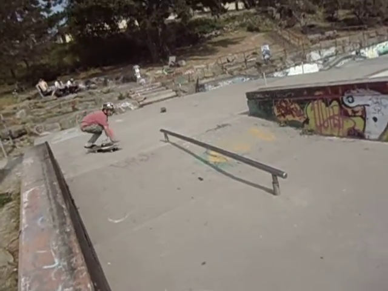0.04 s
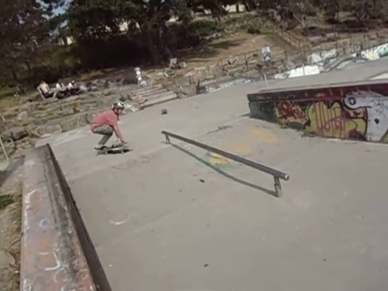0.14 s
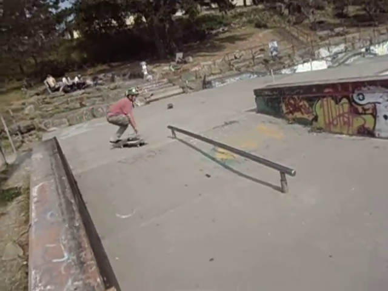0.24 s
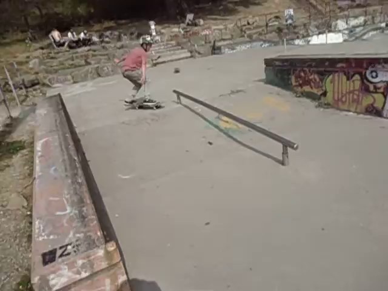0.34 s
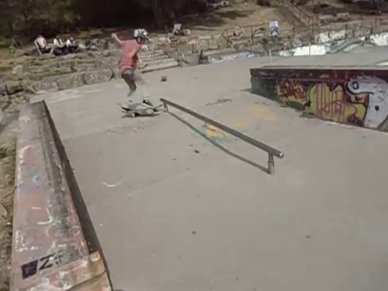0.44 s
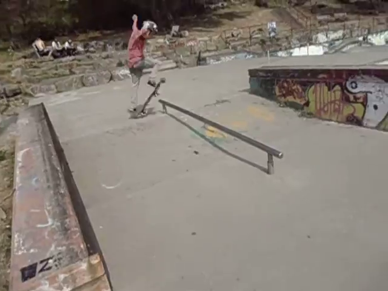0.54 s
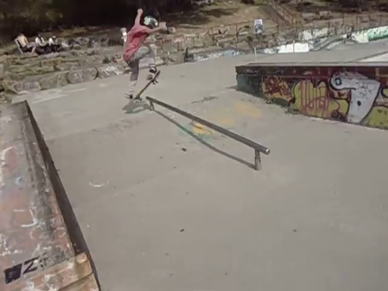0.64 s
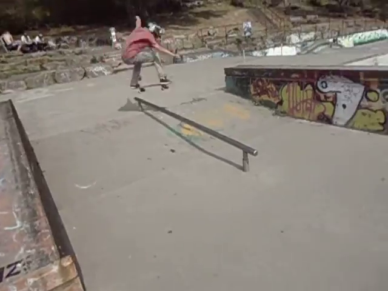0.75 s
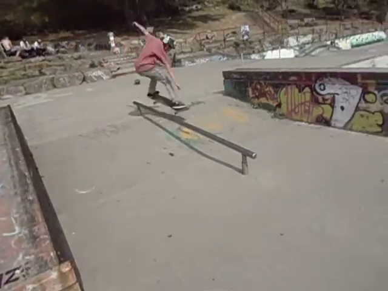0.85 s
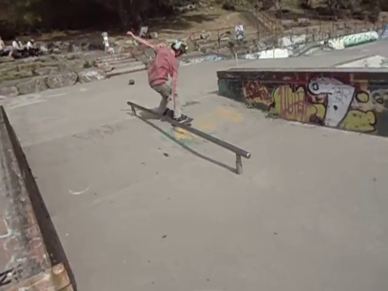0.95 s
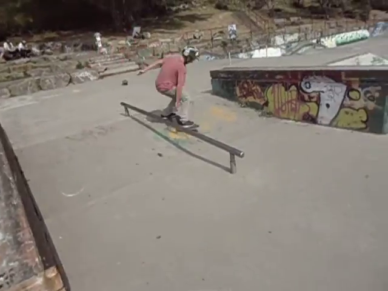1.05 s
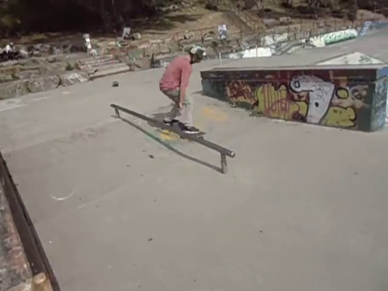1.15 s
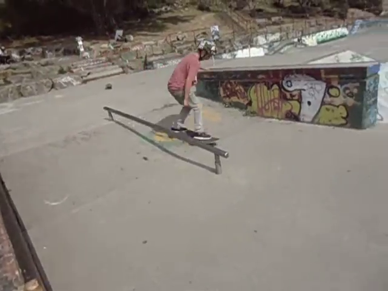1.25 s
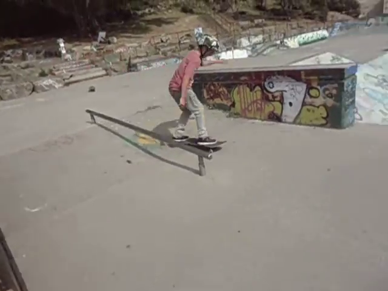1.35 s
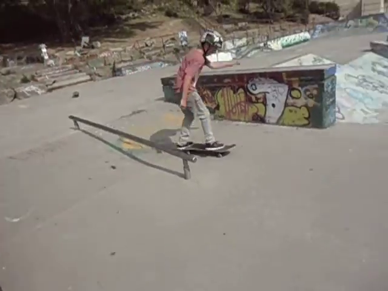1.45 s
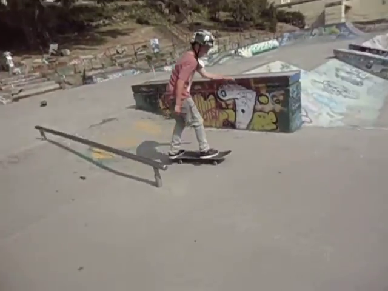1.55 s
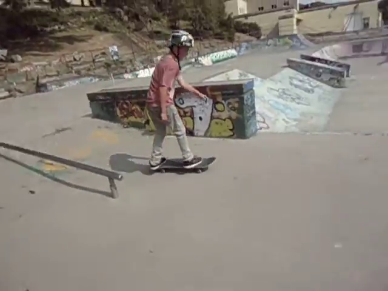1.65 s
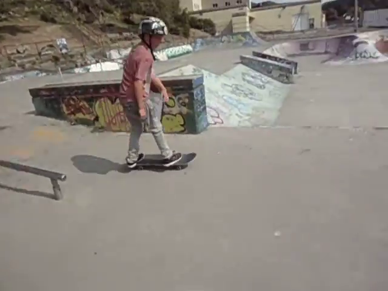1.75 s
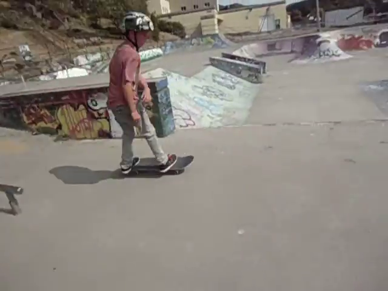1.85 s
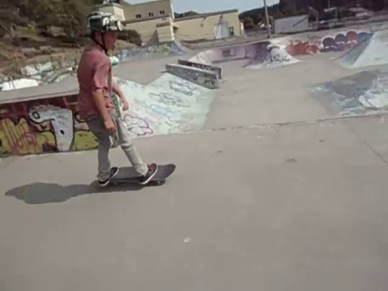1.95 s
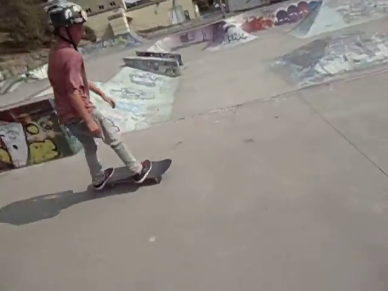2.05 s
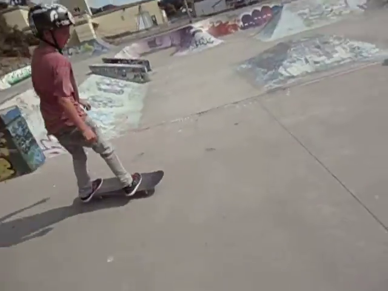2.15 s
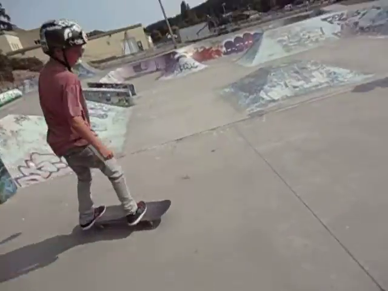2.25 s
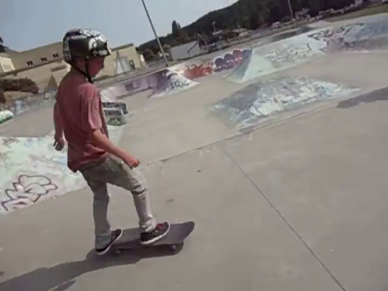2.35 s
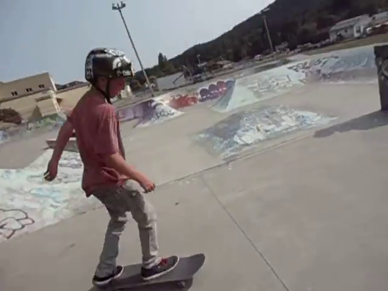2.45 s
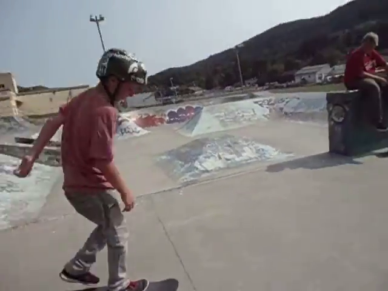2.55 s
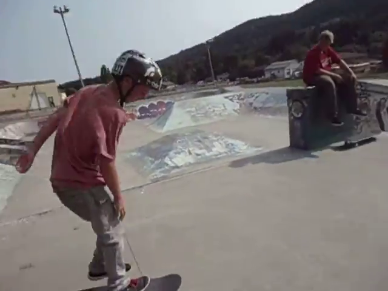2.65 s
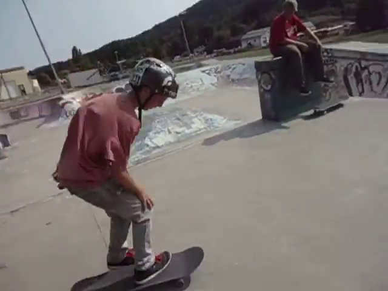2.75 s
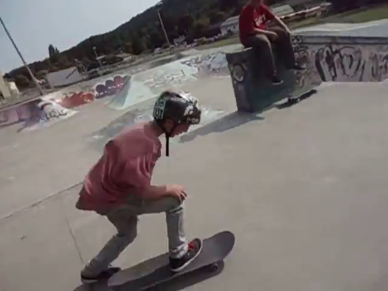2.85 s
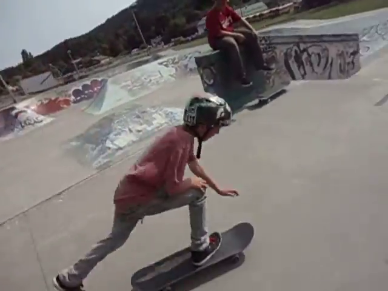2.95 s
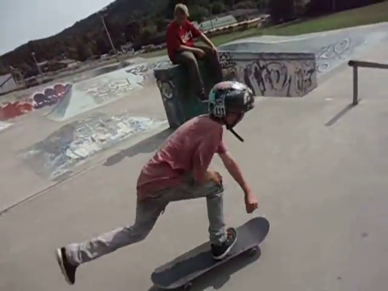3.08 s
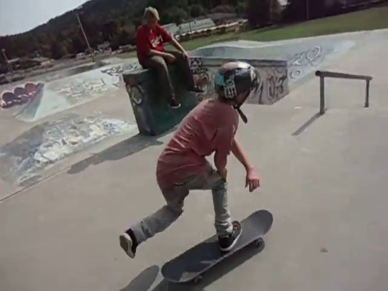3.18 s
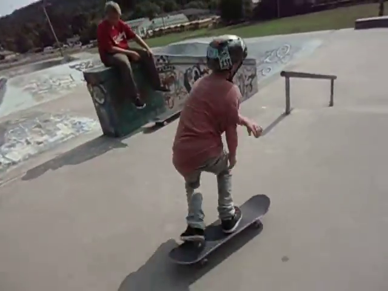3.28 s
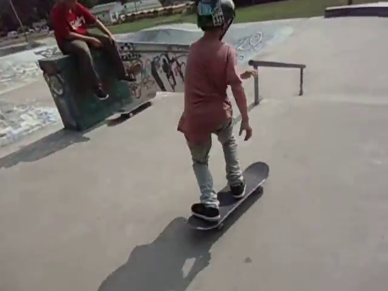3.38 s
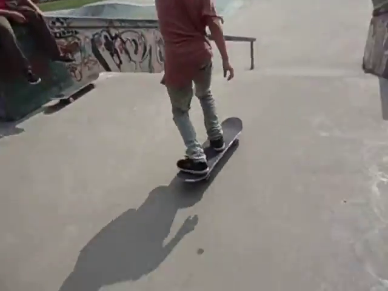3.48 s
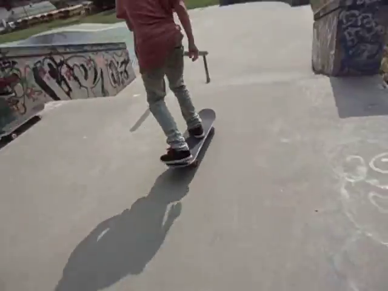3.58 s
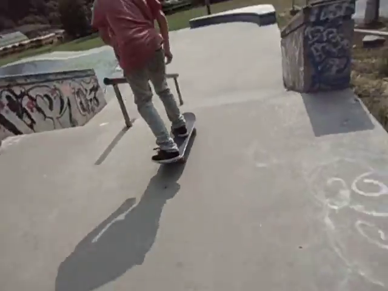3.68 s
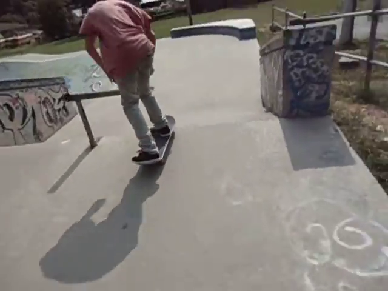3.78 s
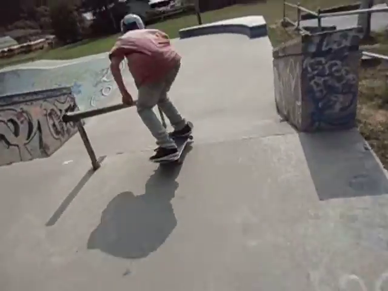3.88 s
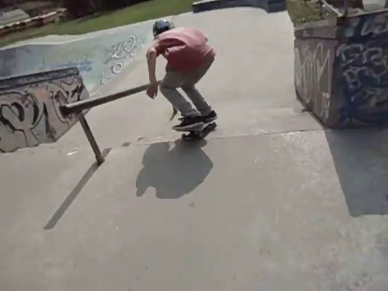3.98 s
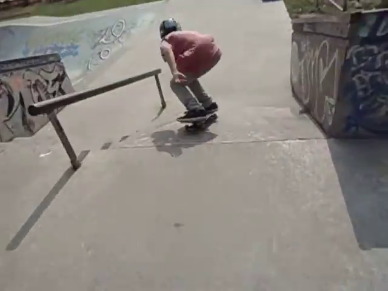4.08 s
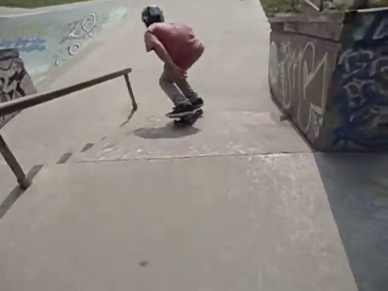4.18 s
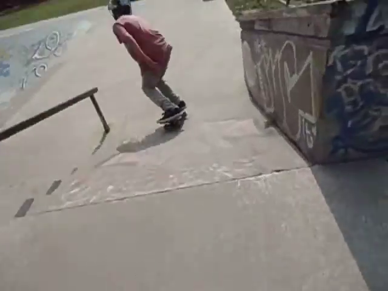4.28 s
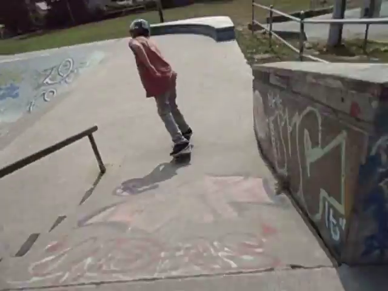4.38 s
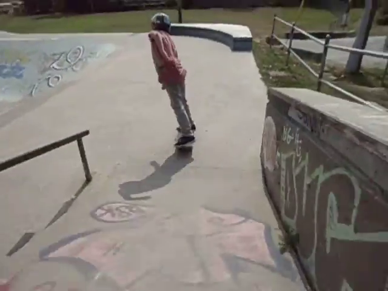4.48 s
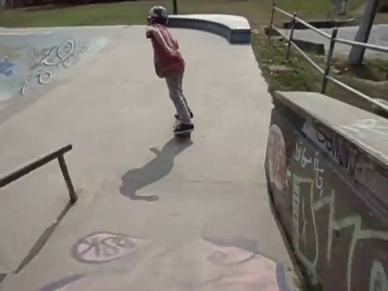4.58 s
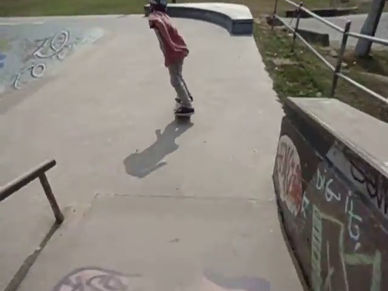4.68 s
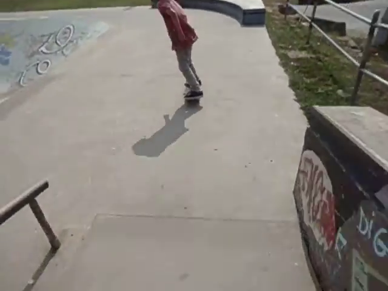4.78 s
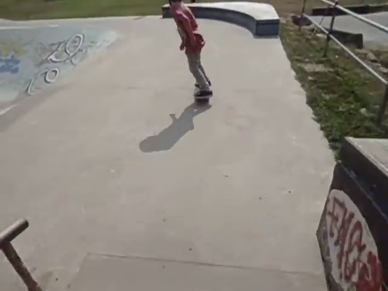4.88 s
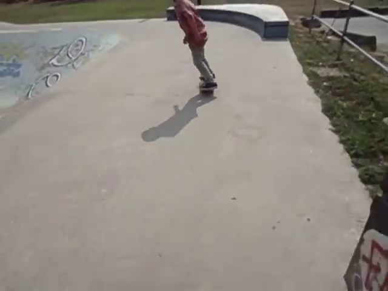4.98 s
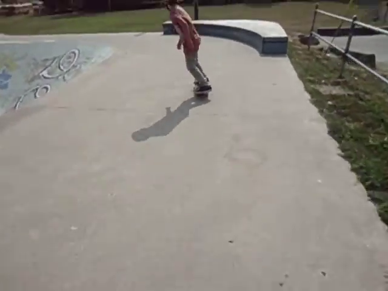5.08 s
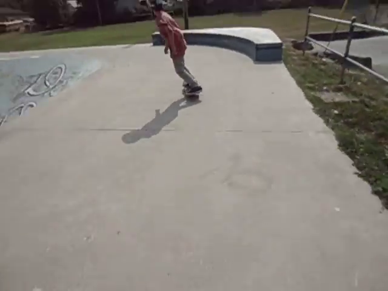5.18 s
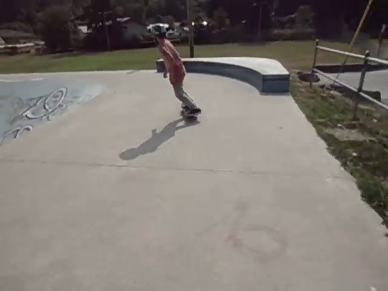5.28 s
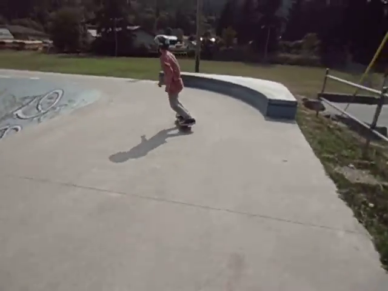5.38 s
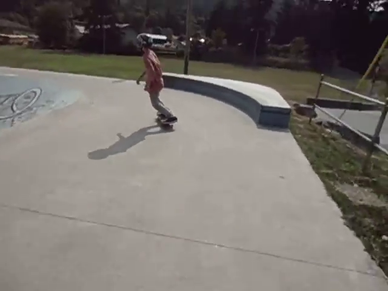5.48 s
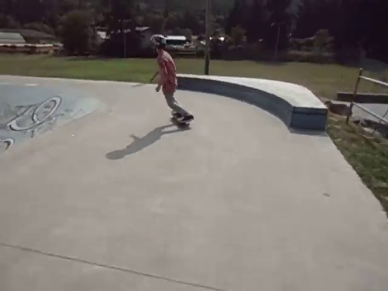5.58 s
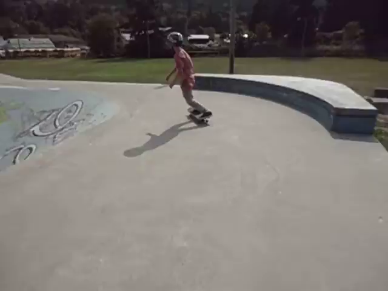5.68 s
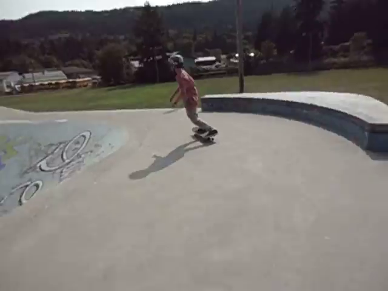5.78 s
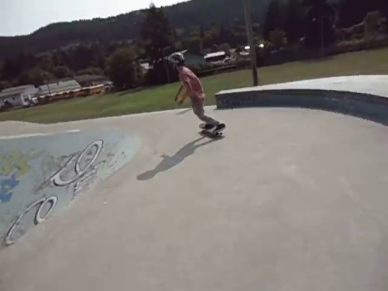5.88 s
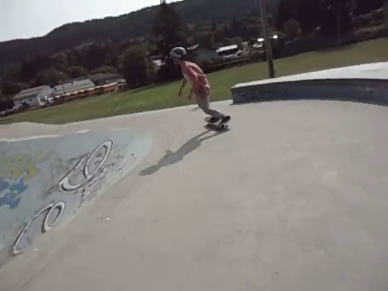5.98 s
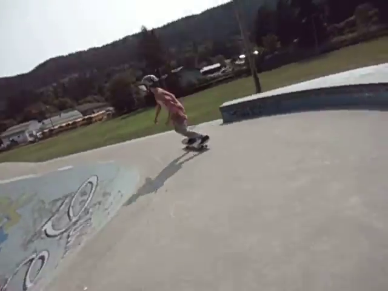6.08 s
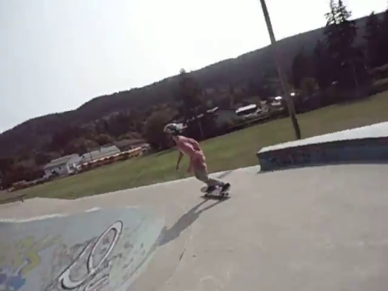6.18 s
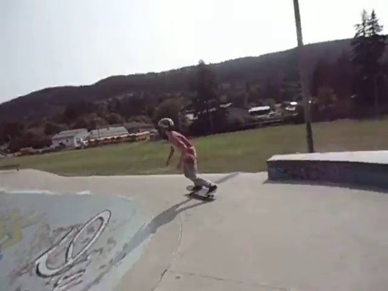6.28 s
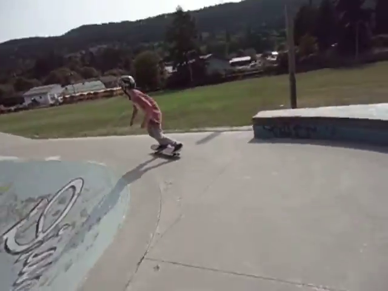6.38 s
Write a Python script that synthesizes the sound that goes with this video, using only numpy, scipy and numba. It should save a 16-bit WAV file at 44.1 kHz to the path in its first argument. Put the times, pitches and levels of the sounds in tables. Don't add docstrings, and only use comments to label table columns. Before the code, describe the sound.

At an outdoor concrete skatepark, hard wheels hum faintly over grit, the tail pops, there is a brief airborne gap, and trucks slam onto a rail. Light scraping and ticking follow, then pushes, shoe scuffs and knocks. The board hops a small drop with a clack and rolls off with a growing hollow rumble. A small, narrow camera microphone thumps in the wind and overloads on peaks.

```python
import sys
import numpy as np
from scipy import signal
from scipy.fft import rfft, irfft
from scipy.io import wavfile
from scipy.ndimage import uniform_filter1d
from numba import njit

SR = 44100
rng = np.random.default_rng(int(sys.argv[2]) if len(sys.argv) > 2 else 0)


def wrap_up_sound(samples):
    columns = np.atleast_2d(samples).T
    tamed = np.clip(columns, -1, 1)
    steps = np.round(tamed * 32767).astype(np.int16)
    wavfile.write(sys.argv[1], SR, steps)


def volts(x):
    e = np.asarray(x, float) / 20
    return 10 ** e


N = 283563


def level(x):
    return x / np.sqrt(np.mean(x ** 2))


def curves(table):
    s, *columns = np.transpose(table)
    return [np.interp(np.arange(N) / SR, s, c) for c in columns]


def stretches(table):
    row = np.searchsorted(np.array(table)[:, 0], np.arange(N) / SR, "right") - 1
    held = np.array(table)[np.maximum(row, 0), 1:].T
    return uniform_filter1d(held, int(0.046 * SR))


def bump(s, length_s):
    return np.exp(-((np.arange(N) / SR - s) / length_s) ** 2)


def walk(rate_hz):
    k = int(SR / rate_hz)
    held = np.repeat(rng.standard_normal(N // k + 1), k)
    return 1.27 * uniform_filter1d(uniform_filter1d(held, k), k)[:N]


@njit
def svf(x, hz, width_hz):
    y, b, l = np.empty(len(x)), 0., 0.
    for i in range(len(x)):
        g, k = np.tan(np.pi * hz[i] / SR), width_hz / hz[i]
        v = (b + g * (x[i] - l)) / (1 + g * (g + k))
        b, l, y[i] = 2 * v - b, l + 2 * g * v, k * v
    return y


def band(x, lo_hz, hi_hz, order=2):
    return signal.sosfilt(signal.butter(order, [lo_hz, hi_hz], "band", fs=SR, output="sos"), x)


def ring(x, modes):
    out = np.zeros(len(x))
    for k, (hz, width_hz, db) in enumerate(modes):
        out += (-1) ** k * volts(db) * svf(x, np.full(len(x), 1. * hz), 1. * width_hz)
    return out


def lift(x, hz, width_hz, ring_db, trim):
    return (x + volts(ring_db) * svf(x, hz, width_hz)) / (1 + trim * volts(ring_db))


def grit(rate_hz, scatter_db):
    kicks = (rng.random(N) < rate_hz / SR) * rng.standard_normal(N)
    return level(np.tanh(1.35 * kicks * volts(scatter_db * rng.exponential(size=N))))


def share(x, k, tilt):
    parts_hz = [330, 640, 1350, 2500, 4300, 9000]
    hz = np.arange(N // 2 + 1) * SR / N + 1
    hill = np.interp(np.log(hz), np.log(parts_hz[k:k + 3]), [0, 1, 0])
    return level(irfft(rfft(x) * np.sin(np.pi / 2 * hill) * hz ** tilt, N))


def rolling():
    # (from [s], deck [Hz], ring [dB], wheel [Hz], ring [dB])
    rings = [(0, 540, 8, 1100, 2), (.3, 720, 32, 1100, 14), (.6, 590, 1, 1150, -1), (1.25, 565, 7, 1110, 7),
             (1.68, 540, 23, 1170, 7), (1.9, 534, 4, 1280, -6), (2.3, 672, 10, 1410, -0.5),
             (2.749, 669, 15, 1300, 1.5), (3.5, 820, -22, 1170, -8), (4.25, 745, -7, 1004, -26),
             (4.44, 603, -22, 1405, 15), (4.58, 520, -12.5, 1380, 4), (5.35, 492, -14, 1250, 5),
             (6.14, 601, -8.5, 1240, 2)]
    # (from [s], pitch [Hz], ring [dB])
    truck_rings = [(0, 3670, -17), (1.0, 4540, -27), (1.6, 3070, -17), (1.95, 4300, -25), (2.58, 2300, -2),
                   (2.78, 4800, -4), (3.55, 2360, 2.5), (4.5, 1930, 2.5), (4.9, 3490, -1), (5.33, 2460, -4),
                   (5.6, 2660, -1), (5.95, 2800, 3.5)]
    deck_hz, deck_db, wheel_hz, wheel_db = stretches(rings)
    truck_hz, truck_db = stretches(truck_rings)
    gains, boom_gain = board_gains()

    coarse_db = np.where(np.arange(N) > 4.1 * SR, -14, 2)
    coarse = volts(-9.5) * grit(160, 2.7) * volts(3.9 * walk(14) + coarse_db)
    road = level(grit(2500, 2.5) + .6 * coarse) * volts(1.9 * walk(30))
    metal = level(grit(900, 3.0) + .7 * road + coarse) * volts(1.7 * walk(40))

    deck = lift(share(road, 0, -1.24), deck_hz, 130.0, deck_db, 0.53)
    wheels = lift(share(road, 1, -1.1), wheel_hz, 220.0, wheel_db, 0.5)
    gains[2:] *= volts(np.array([walk(16), walk(16)]))
    trucks = volts(-4.0) * share(metal, 2, -0.75)
    bearings = volts(1.5) * share(metal + 0.5 * rng.standard_normal(N), 3, 1.0)
    high = lift(gains[2] * trucks + gains[3] * bearings, truck_hz, 370.0, truck_db, 0.71)
    boom = boom_gain * level(band(road, 177.0, 412))
    return gains[0] * deck + gains[1] * wheels + high + boom


def board_gains():
    # (time [s], level [dB], brightness [dB], low boom relative to the level [dB])
    roll = [(0, -45.5, -16.5, -4.5), (.3, -43, -9, -3.5), (.52, -50.5, -5.5, 7), (1.05, -55, -5.5, 2.5),
            (1.4, -43, -6.5, -10.5), (1.6, -50, -13, -15), (1.75, -42, -7, -6), (2.15, -49, 1.5, -7.5),
            (2.5, -38, -14, 0), (2.85, -37, -7.5, 1), (3.2, -30, -24.5, -6.5), (3.6, -33, -5, -3),
            (3.93, -36.5, -3, 3.5), (4.35, -27, -6.5, -2), (5.15, -32, -4.5, 3), (5.42, -21, -24, -9),
            (5.9, -30, -14.5, -6), (6.43, -25.5, -17, -2.5)]
    # (take-off [s], touch-down [s], drop [dB])
    air = [
        (0.588, 0.95, -29),
        (2.459, 2.513, -5),
        (4.01, 4.213, -8),
    ]
    # (time [s], level [dB], brightness [dB], length [s])
    loads = [(0, -67.5, 20.5, 0.053), (0.433, -55.5, 6.5, 0.034), (0.597, -56, 14.5, 0.076),
             (0.78, -62, 11.5, 0.09), (0.92, -86, 46.5, 0.024), (0.984, -24.5, -17, 0.02),
             (1.046, -48.5, 3.5, 0.046), (1.147, -82.5, 40, 0.042), (1.308, -43, -8.5, 0.029),
             (1.663, -72, 21, 0.13), (2.293, -48, -41, 0.08), (2.424, -55, 8, 0.028),
             (2.69, -42, -7.5, 0.097), (2.892, -30, -21, 0.064), (3.074, -32, -17, 0.082),
             (3.22, -51.5, 12, 0.078), (3.367, -33, -9.5, 0.057), (3.727, -35.5, -37, 0.051),
             (4.5, -33.5, -6, 0.041), (4.91, -32.5, -22.5, 0.072), (5.287, -27, -10, 0.051),
             (6.05, -37.5, -8, 0.06), (6.167, -53, 2.5, 0.038), (6.22, -24, -32, 0.05),
             (6.285, -27.5, -37, 0.13)]
    # (offset [dB], share of the brightness [1])
    parts = [
        (-0.5, 0.063),
        (0.5, 0.68),
        (-1.87, 0.88),
        (-6, 0.99),
    ]

    def part_gains(db, bright_db):
        return np.array([volts(db + off_db + part * bright_db) * np.ones(N) for off_db, part in parts])

    t = np.arange(N) / SR
    db, bright_db, boom_db = curves(roll)
    for off, on, drop_db in air:
        db = db + drop_db * np.clip(np.minimum(t - off, 10 * (on - t)) / 0.067, 0, 1)
    gains = part_gains(db, bright_db)
    for s, load_db, load_bright_db, length_s in loads:
        gains += part_gains(load_db, load_bright_db) * bump(s, length_s)
    return gains, volts(db + boom_db)


def blows():
    # (time [s], peak [dB], knock pitch [Hz], hardness
    # [dB], t60 [s])
    slams = [(.559, 5.5, 1550, 20.5, 0.056), (.567, -13, 1100, -0.5, 0.07), (.933, -1, 900, -3.5, 0.069),
             (.937, 1, 483, 0, 0.047), (0.9405, 3.5, 640, -7, 0.048), (.949, -9, 574, -6, 0.027),
             (.9624, 1.5, 1040, -9, 0.037), (0.965, 5.5, 747, -6, 0.051), (0.976, -11, 516, 3, 0.026),
             (3.9636, -3, 793, -21, 0.044), (4.23, -9.5, 960, -45, 0.15), (4.9225, 2, 718, -27.5, 0.038)]
    # (time [s], peak [dB], knock pitch [Hz], hardness [dB])
    knocks = [(0.511, -25, 700, 23), (.745, -37, 1050, -7), (0.812, -23.5, 1220, 21), (1.301, -26, 584, 10),
              (1.426, -24.5, 766, -43), (2.056, -28, 540, -12), (2.261, -27, 535, -64),
              (2.426, -27.5, 501, 5), (2.436, -28.5, 735, -8), (2.826, -13.5, 720, -30.5),
              (3.0, -34, 700, -23), (3.057, -23, 700, -25.5), (3.291, -28, 700, -13), (3.31, -22, 721, 16),
              (3.325, -35, 700, -4), (3.363, -10.5, 1285, -27), (3.377, -12.5, 513, -61),
              (3.87, -18.5, 1440, -6.5), (3.979, -14.5, 645, -61), (4.015, -20, 645, -37),
              (4.032, -27.5, 1090, 11), (4.173, -21, 805, -20), (4.344, -12.5, 970, -26),
              (4.368, -16, 840, -56), (4.463, -19, 606, -22), (4.757, -13.5, 486, -34),
              (4.774, -7.5, 1240, -46), (5.397, -19, 600, -42), (6.009, -19.5, 500, -39),
              (6.184, -26, 554, -32)]
    # (pitch [Hz], width [Hz], level [dB])
    deck_modes = [(520, 56, 6), (720, 29, 8), (1100, 87, -10.5), (1300, 25, -23)]
    # (pitch [Hz], width [Hz], level [dB])
    truck_modes = [(2020, 800, 11.5), (2300, 120, 4.5), (2800, 230, -19), (2980, 67, -7.5),
                   (4640, 4300, 16.5), (4800, 250, 4.5)]
    out, t = np.zeros(N + SR), np.arange(SR // 4) / SR
    for s, db, knock_hz, hard_db, t60_s in [*slams, *[(*row, 0.06) for row in knocks]]:
        fall = np.exp(-np.log(1000) * t / max(t60_s, .004)) * np.minimum(t / 0.0007, 1)
        burst = rng.standard_normal((3, len(t))) * [fall, fall ** 1.01, fall ** 3.6]
        burst += 2.43 * np.exp(-t / 0.00024)
        deck = ring(burst[0], [(knock_hz, 170, 0)]) + .5 * ring(burst[0], deck_modes)
        deck += 0.19 * band(burst[0], 580, 1900, order=3)
        deck = band(deck, min(480, .8 * knock_hz), 5000)
        body = band(burst[1], 2100, 2700) + .5 * ring(burst[1], truck_modes[:3])
        crack = band(burst[2], 3090, 5200) + 0.022 * ring(burst[2], truck_modes[3:])
        layers = [(0, deck), (2 + 0.54 * hard_db, body), (hard_db, crack)]
        if .9 < s < 1.0:
            layers.append((-10, band(burst[0], 170, 300)))
        hit = sum(volts(g - max(hard_db, 0)) * p / np.abs(p).max() for g, p in layers)
        out[int(s * SR):int(s * SR) + len(t)] += volts(db - 3.0) * hit
    return out[:N]


def snaps(table, turns, db):
    out, t = np.zeros(N + SR), np.arange(SR // 50) / SR
    for (s, peak_db, hz), lean in zip(table, rng.standard_normal((len(table), 2))):
        fall = np.exp(-hz * t / turns)
        onset = 1 - np.exp(-(3 * hz * t) ** 2)
        overtone = np.sin(2 * np.pi * hz * t * (1.7 + 0.35 * lean[1]))
        kick = fall * onset * (np.sin(2 * np.pi * hz * t) + 0.46 * lean[0] * fall * overtone)
        out[int(s * SR):int(s * SR) + len(t)] += volts(peak_db + db) * kick
    return out[:N]


def grain_ticks():
    # (time [s], peak [dB], pitch [Hz])
    ticks = [(1.1187, -35, 3010), (2.5712, -27, 1120), (4.9235, -22, 1500), (1.2993, -33, 2250),
             (1.3053, -24, 3270), (1.428, -27, 3290), (2.8434, -24, 1205), (4.231, -21, 1300),
             (1.7075, -34, 1200), (1.866, -37, 1200), (2.9007, -29, 1210), (3.3255, -25, 4400),
             (3.102, -26, 4700), (2.0865, -23, 2070), (3.0085, -30, 1300), (2.2243, -26.5, 2190),
             (2.4258, -21, 1340), (2.4372, -15, 3300), (0.9631, 0, 2100), (2.523, -36, 2260),
             (2.5704, -29, 2020), (2.6183, -27, 2220), (2.6542, -34, 2080), (2.6647, -25, 2010),
             (2.6831, -22, 2080), (2.7265, -28, 2240), (0.978, -14, 3000), (2.7694, -33, 2800),
             (2.7884, -26, 2040), (2.8068, -25, 2060), (2.828, -28, 2010), (2.9241, -29, 2080),
             (3.0927, -32, 2000), (3.1297, -21, 1340), (3.1705, -31, 4640), (3.2614, -29, 1340),
             (3.3328, -21, 1300), (3.3092, -23, 3600), (3.3626, -23, 2150), (3.6211, -24, 902),
             (3.3447, -22, 1270), (3.5247, -41, 2300), (3.5631, -28, 2250), (3.6439, -30, 2520),
             (3.68, -30, 2110), (3.7866, -37, 2000), (3.841, -21.5, 2290), (3.8679, -26, 2010)]
    return snaps(ticks, turns=.5, db=6)


def deck_taps():
    # (time [s], peak [dB], pitch [Hz])
    taps = [(0.812, -26, 1170), (1.301, -28, 580), (1.427, -28, 746), (3.9638, -0.5, 854),
            (3.292, -24, 720), (2.056, -28, 800), (2.191, -27, 900), (2.26, -25, 544), (6.246, -15, 620),
            (2.46, -25, 485), (2.738, -33, 730), (2.999, -9, 440), (3.057, -25, 700), (3.9815, -10, 674),
            (4.172, -21.5, 547), (4.197, -19.5, 627), (4.369, -11, 860), (4.589, -18, 485),
            (4.698, -21.5, 1050), (5.111, -14, 500), (5.375, -17, 714), (5.397, -8.5, 567),
            (6.196, -8, 600), (5.596, -27, 509), (5.756, -17, 527), (5.814, -12, 480), (5.928, -14, 470),
            (6.001, -12.5, 468), (6.182, -8.5, 550), (6.342, -10, 497)]
    return snaps(taps, turns=1.6, db=0)


def stones():
    # (time [s], peak [dB], pitch [Hz])
    scrapes = [(1.132, -30, 2980), (1.248, -32.5, 2900), (1.6232, -37, 3020), (1.6944, -35, 3280),
               (1.9744, -36, 2780), (2.0025, -32, 4200), (2.082, -31.5, 4130), (2.168, -29.5, 2400),
               (2.168, -36, 4520), (2.2234, -34, 2860), (0.252, -38, 3500), (2.3854, -34, 2620),
               (2.4359, -24, 3370), (2.5234, -30.5, 2400), (2.567, -33, 2590), (3.869, -23, 4200),
               (2.684, -29, 4430), (2.7377, -28, 2450), (2.782, -30, 2580), (2.806, -24, 2590),
               (3.377, -27, 3000), (2.918, -35, 2420), (3.087, -24.5, 4830), (3.1904, -26, 4730),
               (3.2114, -33, 2600), (3.3155, -22, 4760), (3.364, -20.5, 4700), (3.323, -21, 4500),
               (3.6421, -27, 2510), (3.677, -29, 2640)]
    out, t = np.zeros(N + SR), np.arange(SR // 10) / SR
    u = t / 0.0013
    for s, db, hz in scrapes:
        ping = svf(rng.standard_normal(len(t)) * u * np.exp(-u), np.full(len(t), 1. * hz), 1700.0)
        out[int(s * SR):int(s * SR) + len(t)] += volts(db - 1.0) * ping / np.abs(ping).max()
    return out[:N]


def buzzes():
    # (time [s], level [dB], pitch [Hz], width [Hz], length [s])
    loose_parts = [(0.403, -45, 520, 60, 0.062), (0.565, -23, 730, 90, 0.0054),
                   (0.567, -29, 1460, 250, 0.0077), (0.628, -47, 1140, 200, 0.035),
                   (0.759, -47.5, 1160, 302, 0.0089), (0.818, -47, 1300, 400, .01),
                   (5.08, -51, 3400, 350, 0.42), (1.828, -53, 1990, 200, 0.021),
                   (1.95, -50, 1810, 200, 0.093), (2.03, -52, 4200, 250, 0.045),
                   (2.182, -47, 4530, 200, 0.012), (2.26, -33, 950, 400, 0.003),
                   (2.33, -46.5, 750, 100, .04), (2.383, -51, 1480, 120, .06), (2.385, -48, 5180, 300, .03),
                   (2.44, -35, 3500, 500, 0.0069), (2.64, -50.5, 2300, 300, 0.046),
                   (2.692, -48.5, 4400, 300, 0.018), (5.313, -20.5, 500, 600, 0.02),
                   (3.12, -41, 1285, 120, 0.047), (3.23, -50, 4630, 500, 0.045),
                   (3.38, -33, 1314, 151, 0.023), (3.967, -17.5, 654, 130, 0.0043),
                   (4.02, -29, 635, 120, 0.0083), (4.332, -27, 340, 80, 0.023),
                   (4.478, -30.5, 1760, 250, 0.024), (4.53, -37, 1780, 300, .03),
                   (4.62, -36.5, 1565, 150, 0.083), (4.668, -29, 370, 100, 0.064),
                   (4.72, -32, 1036, 120, 0.042), (5.444, -33, 560, 148, 0.091),
                   (5.564, -31, 616, 250, 0.092), (5.628, -22, 395, 150, 0.03),
                   (6.13, -43, 2400, 303, 0.066), (6.144, -50, 3280, 500, 0.097),
                   (6.334, -34, 520, 200, .03)]
    out, shake = np.zeros(N), level(grit(1200, 0.61) + .5 * rng.standard_normal(N))
    for s, db, hz, width_hz, length_s in loose_parts:
        near = slice(max(int((s - 3 * length_s) * SR), 0), int((s + 3 * length_s) * SR))
        buzz = ring(ring(shake[near], [(hz, width_hz, 0)]), [(hz, 2 * width_hz, 0)])
        out[near] += volts(db) * bump(s, length_s)[near] * level(buzz)
    return out


def wind():
    # (time [s], strength [dB], small eddies [dB])
    steady = [(0, -50, 11), (.4, -46.5, 3.5), (.55, -34.5, 1), (.9, -59, 26), (1.05, -52.5, 7),
              (1.35, -49, 1), (1.5, -49, 18), (1.9, -42, -5), (2.4, -39, 4), (2.9, -41.5, 0),
              (3.45, -30.5, 1), (3.65, -37, -6.5), (4.25, -49.5, 5), (4.7, -42, 3.5), (5.1, -30.5, 1.5),
              (5.5, -29.5, -8), (5.95, -31.5, -5), (6.43, -29, -23)]
    # (time [s], strength [dB], small eddies [dB], length [s])
    gusts = [(0.467, -39, -7, 0.027), (0.714, -53, -26, 0.01), (0.823, -44, 3, 0.044),
             (0.931, -26, -25, 0.016), (1.492, -40, -28, 0.025), (1.604, -34.5, -12, 0.033),
             (1.9, -35.5, -3.5, 0.036), (2.236, -42, -35, 0.15), (2.434, -31, -15, 0.02),
             (2.543, -19.5, -21, 0.023), (2.7, -31.5, 2.5, 0.052), (2.938, -33.5, 12, 0.085),
             (3.066, -37.5, 4.5, 0.07), (3.105, -39, 7, 0.022), (3.3, -30.5, -2, 0.051),
             (3.442, -43, -16, 0.033), (3.973, -37.5, -22, 0.053), (4.456, -44.5, -8, 0.081),
             (4.846, -29.5, 3, 0.043), (4.997, -25.5, -13, 0.019), (5.225, -41.5, 20.5, 0.026),
             (5.318, -29, -3.5, 0.076), (6.05, -27.5, -38, 0.04), (6.282, -35, -2, 0.04),
             (6.377, -39, 6, 0.067)]
    # (time [s], peak [dB], pitch [Hz], push 1 or pull -1)
    puffs = [(0.0198, -19.5, 207, 1.0), (0.111, -21, 104.0, 1.0), (0.31, -21, 173, 1.0),
             (0.7877, -15.5, 190.0, 1.0), (0.541, -18, 212.0, 1.0), (0.6942, -14.5, 138, 1.0),
             (0.6978, -20, 138, -1), (0.5522, -12, 170, -1), (0.658, -18, 130, 1), (0.714, -19.5, 150, -1),
             (0.7552, -22, 150, -1), (0.784, -16, 170, -1), (0.825, -21, 120, -1), (0.836, -22, 150, -1),
             (0.8473, -17, 130, -1), (.87, -22, 130, -1), (.929, -20, 70, 1), (0.7961, -11.5, 139, -1.0),
             (1.461, -17, 135, 1.0), (1.598, -24.5, 131, 1.0), (1.877, -19.5, 124, 1.0),
             (1.924, -19, 186, -1.0), (2.436, -15.5, 156.0, -1.0), (2.498, -12.5, 142, -1.0),
             (2.5467, -13, 122, -1.0), (2.727, -9.5, 153.0, 1.0), (2.772, -13.5, 187.0, -1.0),
             (2.8637, -10, 185.0, 1.0), (2.955, -4.5, 216, 1.0), (2.9973, -3, 179, -1.0),
             (3.1428, -0.5, 265, 1.0), (3.2975, -10.5, 138.0, 1.0), (3.3663, -7.5, 157, 1.0),
             (3.4521, -14, 175, -1.0), (4.784, -10.5, 223.0, 1.0), (.792, -21.5, 260, 1),
             (5, -15, 205, -1.0), (5.314, 8, 139, -1.0), (5.317, -1, 480, -1), (5.3182, 5, 450, -1),
             (5.29, -10.5, 40, -1), (5.308, -8, 45, 1), (5.325, -5, 29.6, 1), (5.348, -12, 40, -1),
             (5.5385, -13, 197, -1.0), (6.0125, -20, 236, 1.0), (6.045, -11, 60.5, -1.0)]

    def size_gains(db, small_db):
        return volts(np.array([db, db + small_db, db - 10 + 0.24 * small_db]))

    gains = size_gains(*curves(steady))
    for s, db, small_db, length_s in gusts:
        gains += size_gains(db, small_db)[:, None] * bump(s, length_s)
    rumble, flutter, buffet = gains
    eddies = grit(150, 0.63)
    out = rumble * level(band(rng.standard_normal(N), 10, 74.0, order=3))
    out += flutter * volts(-2.5) * level(band(eddies, 80, 194.4))
    out += buffet * level(band(eddies + 1.2 * rng.standard_normal(N), 210.0, 500))
    t = np.arange(N) / SR
    for s, db, hz, way in puffs:
        near = slice(max(int((s - .04) * SR), 0), int((s + .04) * SR))
        turns = hz * (t[near] - s)
        out[near] += np.sign(way) * volts(db - 3.5) * np.cos(2 * np.pi * turns) * np.exp(-(turns / 0.26) ** 2)
    return out


def ledges(hits):
    t = np.arange(SR // 4) / SR
    tail = rng.standard_normal(len(t)) * np.exp(-t / 0.022) * (t > .012)
    return volts(-48.5) * signal.fftconvolve(hits, tail)[:N]


def scene():
    hits = blows() + stones()
    board = rolling() + hits + grain_ticks() + deck_taps() + buzzes()
    return (board + ledges(hits) + wind())[None]


def low_pass(x):
    return signal.sosfilt(signal.butter(12, 15800, fs=SR, output="sos"), x)


def record(dry):
    # (time [s], size [full scale])
    overflow = [(.4290, .05), (.9682, -.8), (5.3146, .68), (6.4299, -.11)]
    x = 0.58 * np.tanh(dry / 0.58)
    x = signal.sosfilt(signal.ellip(8, 1, 60, 5420, fs=SR, output="sos"), x)
    x = x * (1 + 2 * volts(12) * np.cos(2 * np.pi * 11025 * np.arange(N) / SR))
    x = signal.sosfilt(signal.cheby2(16, 120, 7000, fs=SR, output="sos"), x)
    x = np.append(x, np.zeros((1, 9)), axis=1)
    for s, size in overflow:
        mid = round(s * SR)
        at = slice(mid - 4, mid + 5)
        spike = np.sign(x[0, mid]) * abs(size) * np.sinc(np.arange(-4, 5) / 4)
        x[:, at] = np.clip(x[:, at] - spike, -.72, .72)
    return low_pass(x[:, :N])


dry = scene()
out = record(dry)
wrap_up_sound(out)
```